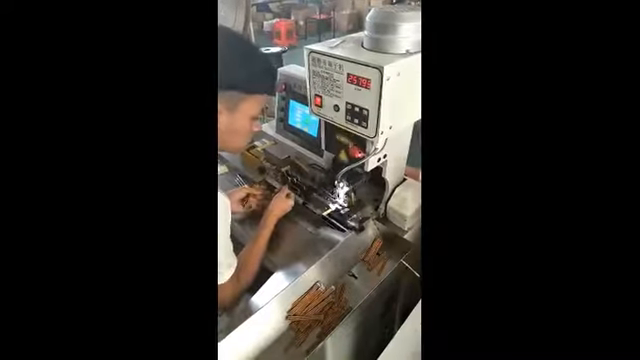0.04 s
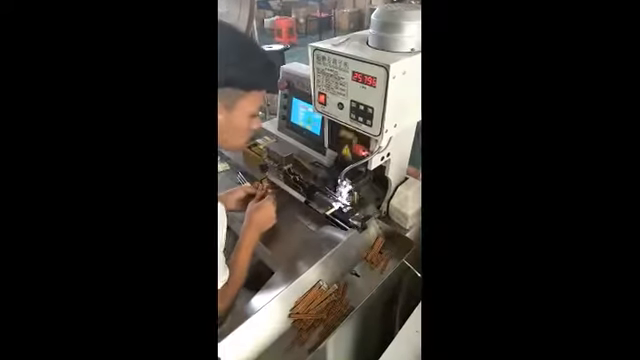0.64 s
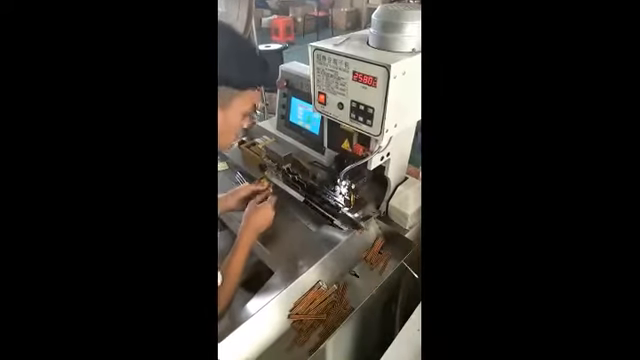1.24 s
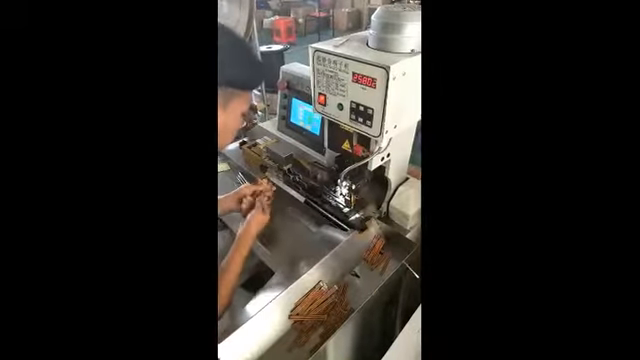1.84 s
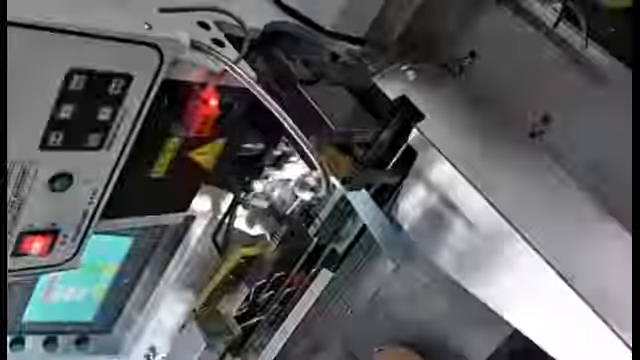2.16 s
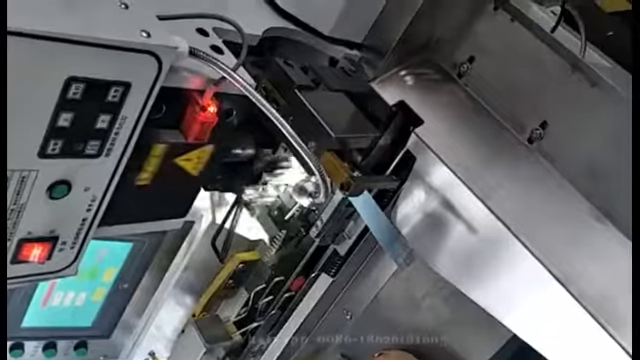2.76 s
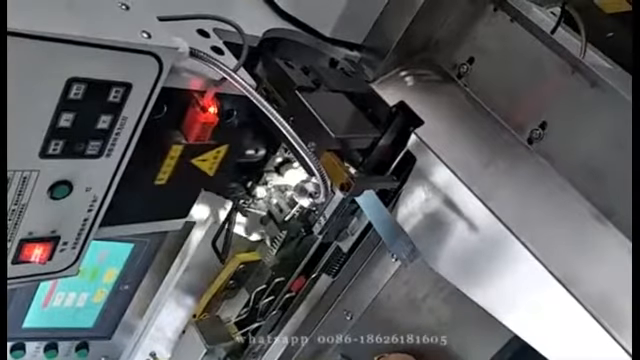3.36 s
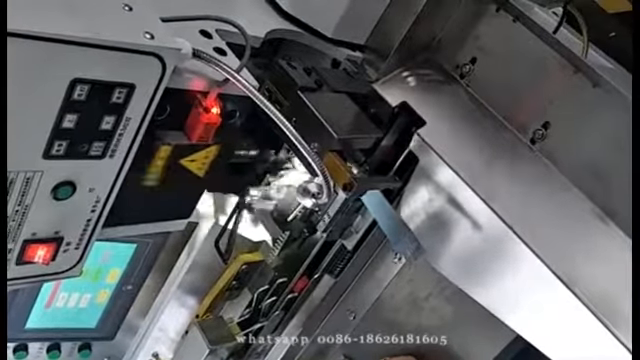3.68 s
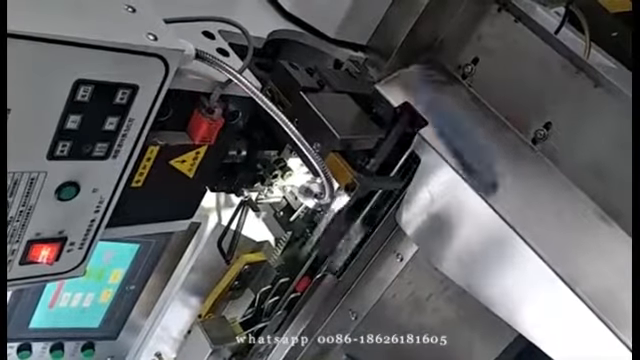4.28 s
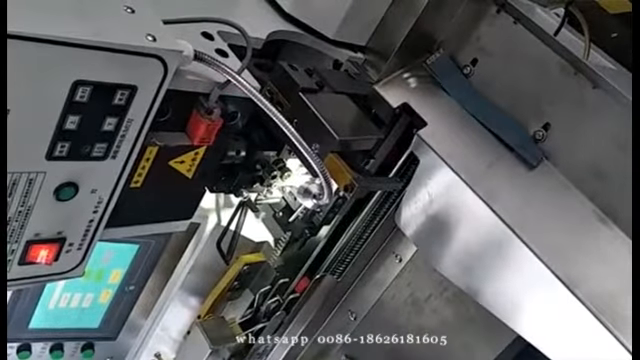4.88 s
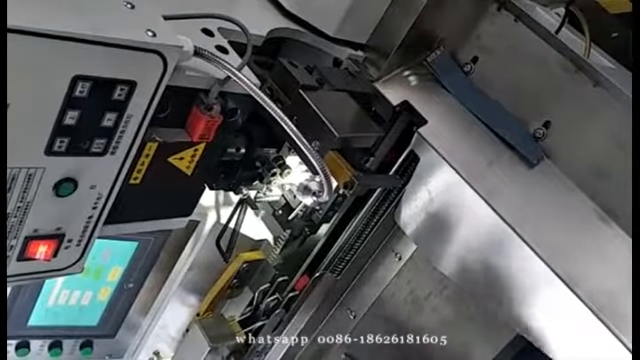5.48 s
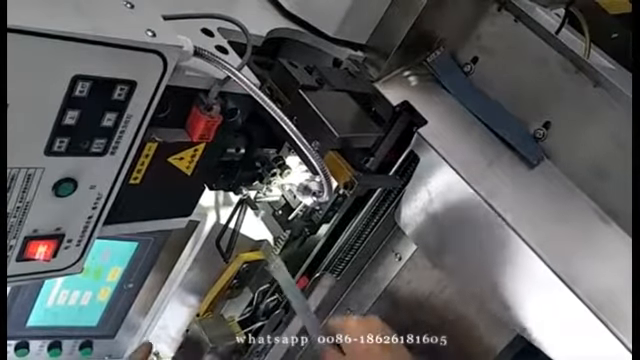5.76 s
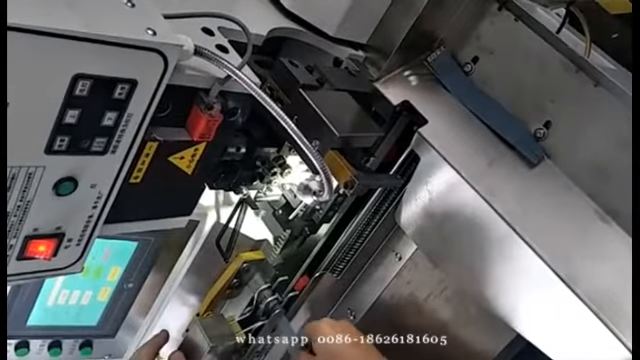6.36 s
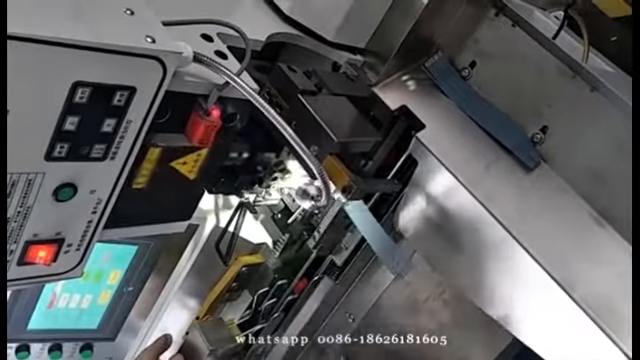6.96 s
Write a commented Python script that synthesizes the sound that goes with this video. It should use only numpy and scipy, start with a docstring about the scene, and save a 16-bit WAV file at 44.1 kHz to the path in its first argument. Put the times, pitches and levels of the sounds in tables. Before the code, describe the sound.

A crimping machine clacks in fast, even metal strokes, cuts off, then clacks more slowly, pauses over a motor hum and restarts.

```python
"""Fast, evenly timed clacks of a cable crimping press, heard in mono from beside the workbench.
Each stroke thumps the ram, knocks the frame, rings the jaws and spits air; a droning stepper motor runs
the rattling carriage into its stops and sheet steel rings. After a silent gap we listen in stereo over
the tray: a slower burst, a pause in which the next cable scrapes in over motor hum and room tone, and
then the gripper snaps and the carriage sets off again."""
import sys
import numpy as np
from scipy import signal
from scipy.fft import rfft, irfft, next_fast_len
from scipy.io import wavfile
from scipy.ndimage import uniform_filter1d

SR = 44100
rng = np.random.default_rng(int(sys.argv[2]) if len(sys.argv) > 2 else 0)


def persist_wave(psi):
    """Save psi, clipped to +-1, as 16-bit WAV."""
    counts = np.round(np.clip(psi, -1, 1) * 32767).astype(np.int16)
    wavfile.write(sys.argv[1], SR, np.atleast_2d(counts).T)


N = 310023

BESIDE_S, ABOVE_S = (0, 1.969), (2.605, 7.1)  # start and end beside the bench and over the tray
BESIDE_TOP_HZ, ABOVE_TOP_HZ = 14200, 7300
SHAKE_S, SETTLE_S = 0.12, 0.064  # after a run the frame shakes on; loose parts settle sooner

# The hits within one press stroke. Each row: time from the crimp in seconds, levels of thump, frame,
# jaw and valve in dB, decay in seconds.
FAST_CYCLE = [(-.045, -5, -5, -35.5, -33, 0.0073), (-.027, -15.5, -22, -9, -26, 0.0072),
              (-.008, -30, -16.5, -4.5, -4.5, 0.012), (0, -24, -10, -1, -19.5, 0.016),
              (0.012, -28.5, -18.5, -12.5, -28.5, 0.088), (0.016, -22, -18, -11.5, -20, .008),
              (0.027, -23, -14, -15.5, -26, .008), (0.052, -17.5, -9.5, -15, -20.5, 0.011)]
SLOW_CYCLE = [(-.05, -15, -2, -20, -35, 0.019), (-.018, -13, -2, -7.5, -23, 0.098),
              (0, -11.5, -8, -3, -14.5, 0.0087), (0.009, -17, -1.5, -15, -16.5, 0.033),
              (.058, -1, -11, -19, -26, 0.0072), (0.112, -7.5, -7, -9.5, -20.5, 0.024)]
# Carriage and clamps hitting their stops. Each row: start in seconds, levels of frame, thud and ring in
# dB, best-excited pitch in Hz, treble limit in Hz, second hit's offset in seconds and relative dB.
STOP_KNOCKS = [(.978, -30, -24, -31, 700, 2500, 0.015, -12), (1.094, -35, -21.5, -20, 353, 1960, .011, -3),
               (1.14, -16.5, -21.5, -18.5, 1060, 2500, 0.0069, -5),
               (1.161, -16.5, -27, -19, 700, 1200, 0.018, -8),
               (1.379, -27, -22.5, -34, 1000, 3980, .015, -2.5),
               (1.68, -17, -16, -15.5, 298, 2500, 0.017, -4.5),
               (1.771, -13.5, -35, -12, 1150, 7000, .008, -4), (4.1, -12.5, -20, -14, 380, 3800, .012, -5),
               (4.548, -17.5, -21, -21, 800, 1490, .007, -4),
               (4.571, -20, -23, -22.5, 800, 1200, 0.0098, -11.5),
               (4.65, -17.5, -26.5, -28, 795, 1200, .017, -5.5),
               (4.686, -24.5, -33, -27, 800, 900, 0.011, -9),
               (6.577, -20.5, -21, -33, 700, 3000, 0.0088, -3.5),
               (6.693, -24.5, -28, -43, 700, 2000, 0.013, -9),
               (6.73, -22, -23, -38, 695, 3000, 0.0077, -5.5),
               (6.957, -19, -16.5, -33, 450, 3000, .01, 1.5), (6.987, -23, -20, -44, 450, 1500, .012, 3)]
# The feed slide's knock: one such row without the start. Its softer hit comes 0.4 seconds earlier.
FEED_KNOCK = (-23, -31.5, -33, 908, 3001, -0.4, -3.5)
# Cam followers and cutter clacking. Each row: start in seconds, level in dB, best-excited pitch in Hz.
CAM_CLACKS = [(2.757, -29, 1600), (2.859, -27.5, 3300), (2.875, -27, 2170), (2.92, -25.5, 1700),
              (2.958, -27, 2600), (3.075, -25.5, 1900), (3.121, -23, 1550), (3.165, -29.5, 3200),
              (3.275, -26.5, 1700), (3.363, -24.5, 2800), (3.478, -29, 2800), (3.545, -32, 3300),
              (3.564, -21, 2400), (3.68, -25, 1610), (3.771, -22, 2000)]
# The gripper closing on the cable. Each row: start in seconds, level in dB, decay in seconds,
# relative ring level in dB, best-excited pitch in Hz.
GRIPPER_SNAPS = [(4.108, -36, .03, 7, 4800), (6.594, -30, .025, -6, 3500), (6.603, -29, .012, -4, 3300),
                 (6.61, -21.5, .01, 7, 3600), (6.731, -27, .007, 9.5, 3950), (6.738, -27, .006, 6, 3950)]
# The gripper's catch springing home: start in seconds, level in dB, decay in seconds.
CATCH_SNAP = (6.615, -36, .003)
# Runs of feeder and carriage. Each row: start, stop and run-up in seconds, slide level in dB,
# chatter against slide in dB, rubbing against loose ticks in dB.
CARRIAGE_RUNS = [(-.1, 1.12, .05, -22.5, -8, 3), (1.374, 1.71, 0.031, -26.5, -4.5, 5),
                 (2.62, 3.86, 0.17, -28, -8, 1), (3.89, 4.58, 0.18, -29, -6, 0.5),
                 (4.39, 4.53, 0.09, -45.5, 2, 13), (6.55, 7.1, 0.26, -25.5, -4, 5)]
# Stepper moves. Each row: start and stop in seconds, opening pitch in Hz, glide in Hz per second,
# levels of drone and buzz in dB.
STEPPER_MOVES = [(1.023, 1.17, 197.7, -100, -33, -46), (1.372, 1.47, 176, 20, -36, -44),
                 (1.43, 1.585, 181, -18, -26, -40.5), (1.545, 1.675, 184, 35, -25, -41),
                 (3.953, 4.011, 206, 47, -22, -49), (4.261, 4.408, 202, -130, -29.5, -51),
                 (4.448, 4.565, 191.3, 221, -31, -49)]
# Exhaust air. Each row: time of the peak in seconds, level in dB, rise and decay in seconds.
AIR_PUFFS = [(.13, -29, 0.04, 0.056), (0.251, -27.5, 0.029, 0.087), (1.096, -33, 0.0061, .04),
             (1.395, -49, 0.0042, 0.063), (1.55, -32, 0.041, 0.032), (1.685, -28, 0.011, 0.03)]
# The idling motor's tones. Each row: pitch in Hz, level in dB.
HUM_TONES = [(96.9, -42.5), (192.5, -48.5), (263.8, -49.5), (384, -56), (446.8, -46.5), (1039, -61.5),
             (1730, -58.5), (3300, -61.5)]
# A swell added to the lowest tone under load: start in seconds, relative level in dB, decay in seconds.
LOAD_SURGE = (6.577, 9.9, .14)

# Ringing steel parts. Each row: pitch in Hz, level in dB, time to fall by 60 dB in seconds.
JAW_MODES = [(1550, 2.5, 0.27), (1725, -1.5, 0.26), (1897, -7, 0.22), (3250, -3.5, 0.068),
             (3340, -6, 0.052), (3500, -6.5, 0.1), (4190, -7.5, 0.14), (4690, -0.5, 0.12),
             (5300, -2.5, 0.082)]
LINKAGE_MODES = [(988, 2, 0.12), (1526, -1.5, .1), (1615, -5.5, .09), (1720, -2, 0.15), (1940, -6.5, .1),
                 (2810, -9, 0.13), (3100, -5, 0.099), (3334, -2.5, .14), (4000, -6.5, .1),
                 (4530, -6.5, .09), (5460, -7.5, 0.073)]
HOUSING_MODES = [(345, -3.5, .5), (446, -2, .33), (642, -6, .2), (715, -9, 0.26), (779, -1.5, 0.3),
                 (901, -1.5, .15), (1066, -7.5, .2), (1200, -6, .15), (1333, -10, 0.33), (1510, -8, 0.153),
                 (1610, -11, .3)]
TRAY_MODES = [(437, -3.5, 0.78), (553, -7, 0.11), (658, -3.5, .23), (700, -4.5, .44), (755, -4.5, 0.75),
              (781.7, -2.5, .6), (819, -2, .14), (841, -14, 1.5), (1264, -6, .2), (1540, -7.5, 0.14),
              (1745, -2, 0.17)]
GRIPPER_MODES = [(2246, -12, .08), (3150, -9, .05), (3330, -6, .07), (3710, -3, .04), (3840, -6, .035),
                 (3967, -5, .055), (4170, -11, .08)]

# Resonances of frame, jaws, rails, panels and room tone. Each row: centre in Hz, width in Hz, dB boost.
FRAME_PEAKS = [(199.8, 37, 10.5), (374.4, 25, 4.5), (447, 20, 6.5), (666, 16, 7.5), (788, 18, 6),
               (935, 22, 3.5), (1056.5, 33, 8.5), (1213, 33, 7.5), (1514, 28, 10.5), (1806, 70, 7)]
JAW_PEAKS = [(1670, 130, 4.3), (3460, 110, 2.6), (4237, 64, 6), (4700, 23, 3.5), (5660, 160, 4.3)]
RAIL_PEAKS = [(1924, 73, 7.5), (2680, 77, 9), (3120, 80, 2), (3886, 120, 5.5)]
PANEL_PEAKS = [(450, 38, 6.1), (714, 40, 5), (910, 40, 8.3), (1065, 53, 21), (1217, 42, 10), (1550, 110, 6)]
SHOP_PEAKS = [(445, 46, 4), (1700, 76, 4.5), (2710, 110, 3.5)]

# Tone colours of the machine's parts and the workshop air. Each row: frequency in Hz, relative dB.
THUMP_EQ = [(30, -20.5), (70, -13), (110, 1.5), (200, -3.5), (340, 1), (600, -21), (2000, -46)]
JAW_EQ = [(300, -23), (1000, -10), (1700, 3.5), (2400, 0.5), (4200, 2), (6000, -5), (8000, -11),
          (14000, -22)]
VALVE_EQ = [(500, -29), (3000, -0.5), (6000, 6), (9000, -6.5), (12000, -1), (14000, 0.5)]
GRIPPER_EQ = [(400, -21), (1500, -7.5), (2800, -6), (3400, -6), (3900, -3), (4300, -15), (5200, -23),
              (8000, -31.5)]
CATCH_EQ = [(2500, -30), (4400, -10), (6000, 3), (8200, 0), (8700, -45), (14000, -66)]
LEAK_EQ = [(2000, -20.5), (4000, -11.5), (4550, 6.5), (5200, -12.5), (7500, -10.5), (9000, -28.5),
           (14000, -22.5)]
SHOP_EQ = [(25, -20), (55, -4.5), (90, -2.5), (170, -2), (300, -7), (480, -8.5), (600, -14), (780, -13),
           (1200, -19.5), (1750, -19.5), (2300, -19), (4300, -25), (5200, -35.5), (7400, -45.5),
           (11000, -58)]
# Frame knock, cabinet thud, slide rumble and bright chatter as they sound from each listening place.
# Each row: frequency in Hz, relative level in dB.
KNOCK_BESIDE_EQ = [(100, -19.5), (300, -4), (450, -0.5), (800, 4), (1150, 2), (1650, -9.5), (2100, -23),
                   (5000, -27.5), (12000, -53)]
KNOCK_ABOVE_EQ = [(100, -19.5), (300, 0.5), (480, -3), (800, 7), (1100, -6.5), (1700, -3.5), (2400, -15),
                  (4000, -14), (7000, -35.5)]
THUD_BESIDE_EQ = [(50, -21), (115, 1), (210, -22), (290, 6), (345, -4), (430, -2), (700, -24),
                  (2000, -69.5)]
THUD_ABOVE_EQ = [(50, -18), (95, 6), (160, 5), (300, -7), (400, 0.5), (470, 16), (580, -5.5), (900, -16),
                 (2000, -29)]
SLIDE_BESIDE_EQ = [(30, -30), (70, -8.5), (115, 5.5), (200, -1), (400, 0.5), (700, 0), (1200, -6.5),
                   (1700, -16), (2500, -22.5), (8000, -51)]
SLIDE_ABOVE_EQ = [(30, -11.5), (70, -10.5), (105, 3), (200, -2), (420, 2), (800, -1), (1200, -10.5),
                  (1800, -17.5), (2600, -23.5), (8000, -42)]
CHATTER_BESIDE_EQ = [(400, -10), (1500, 7), (2400, -2.5), (4300, -2.5), (6000, -10), (8000, -15.5),
                     (14000, -23.5)]
CHATTER_ABOVE_EQ = [(400, -8), (1200, 1.5), (1900, 3.5), (2500, 0), (4000, -2), (5000, -12.5), (7400, -22)]

# Stereo width from reflections over the tray. Each row: frequency in Hz, side against mid in dB.
STEREO_WIDTH = [(60, -33.5), (120, -38), (200, -28), (370, -12), (680, -3), (1260, -1), (2600, 1.5),
                (4200, 0), (7500, -0.5)]
# The machine stands to the right. Each row: frequency in Hz, left minus right in dB at an offset of 1.
STEREO_BALANCE = [(110, -1.5), (370, -3.5), (680, -9), (1260, -5), (2300, -0.5), (4200, 3)]


def press(strokes, cycle, frame_eq, jaw_eq, modes, crack_db, ring_db, ring_hz):
    """Each stroke runs one cam cycle: the ram thumps, the frame knocks, jaws clack, the valve spits."""
    def part(column):
        hits = [(s + step[0], db + step[column], step[-1]) for s, db in strokes for step in cycle]
        return blows(hits, room_db=-12.5, room_s=0.083, crack_db=crack_db)
    thump = colour(part(1), THUMP_EQ)
    frame = colour(part(2), frame_eq, FRAME_PEAKS)
    jaws = colour(part(3), jaw_eq, JAW_PEAKS)
    valve = colour(part(4), VALVE_EQ)
    jaw_hits = [(s + lag, db + jaw_db + ring_db, ring_hz)
                for s, db in strokes for lag, _, _, jaw_db, _, _ in cycle if s + lag > 0]
    return thump + frame + jaws + valve + ring(jaw_hits, modes, octaves=2.4, rough=.22)


def stroke_burst(first_s, period_s, db, count, run_up_db=0, run_up_s=0.16):
    """Evenly timed strokes (s, dB); with a run-up they start soft and build to full force."""
    elapsed = period_s * np.arange(count)
    return list(zip(first_s + elapsed, db + run_up_db * np.exp(-elapsed / run_up_s)))


def carriage_stops(knocks, frame_eq, thud_eq, modes, room_db, room_s, rough):
    """The carriage hits each stop twice: a hard knock, a dull cabinet thud and ringing steel."""
    hits = [(s + lag, frame + db, thud + db, steel + db, hz, top)
            for s, frame, thud, steel, hz, top, second_s, second_db in knocks
            for lag, db in ((0, 0), (second_s, second_db))]
    s, frame_db, thud_db, ring_db, best_hz, top_hz = np.transpose(hits)
    knock = heavy_blows(zip(s, frame_db, top_hz), decay_s=0.013, room_db=room_db, room_s=room_s)
    thud = heavy_blows(zip(s, thud_db, top_hz), decay_s=0.0074, room_db=-8, room_s=0.096)
    steel = ring(zip(s, ring_db, best_hz), modes, octaves=0.68, rough=rough)
    return colour(knock, frame_eq, FRAME_PEAKS) + colour(thud, thud_eq) + steel


def feed_knocks(strokes, lead_s=.047):
    """Cues for the feed slide, which meets its stop just ahead of each crimp in mid-burst."""
    return [(s - lead_s, *FEED_KNOCK) for s, _ in strokes[2:-1]]


def linkage():
    """Steel followers drop against their cams: a short hard clack, then the linkage rings."""
    hits = blows([(s, db, .012) for s, db, _ in CAM_CLACKS], room_db=-12, room_s=0.032, crack_db=-18)
    clack = undb(-10) * colour(hits, CHATTER_ABOVE_EQ, JAW_PEAKS)
    return clack + ring(CAM_CLACKS, LINKAGE_MODES, octaves=0.87, rough=0.33)


def gripper():
    """The gripper snaps shut with a rough, quickly damped clack and a short ring."""
    s, db, decay, ring_db, best_hz = np.transpose(GRIPPER_SNAPS)
    hits = blows(zip(s, db, decay), room_db=-13, room_s=0.03, crack_db=-20)
    steel = ring(zip(s, db + ring_db, best_hz), GRIPPER_MODES, octaves=0.45, rough=.4)
    return undb(2.5) * colour(hits, GRIPPER_EQ) + steel


def catch():
    """The gripper's catch springs home with one bright mono snap."""
    return colour(blows([CATCH_SNAP], room_db=-20, room_s=.012, crack_db=-12), CATCH_EQ)[0]


def carriage_rattle(runs, slide_eq, chatter_eq, spread_db):
    """Moving slides shake the frame and rub, while small loose parts chatter."""
    slides = colour(contacts(rate=300, spread_db=2, smear_s=0.004), slide_eq, FRAME_PEAKS)
    rub = colour(contacts(rate=110, spread_db=-1.5, smear_s=0.02), chatter_eq, JAW_PEAKS + RAIL_PEAKS)
    ticks = colour(loose_parts(rate=125, spread_db=spread_db, ring_s=.015), chatter_eq, JAW_PEAKS)
    out = 0
    for start, stop, rise, db, chatter_db, rub_db in runs:
        blend = (ticks + undb(rub_db) * rub) / np.hypot(1, undb(rub_db))
        chatter = undb(chatter_db) * swell(start, stop, rise, SETTLE_S) * blend
        rumble = swell(start, stop, rise, SHAKE_S) * slides
        out = out + undb(db) * (rumble + chatter)
    return out


def loose_parts(rate, spread_db, ring_s, partials=5):
    """Small steel parts tick at random, each ringing briefly at a few pitches of its own."""
    out, t = np.zeros((2, N + SR)), np.arange(SR // 25) / SR
    for _ in range(int(rate * N / SR)):
        start = rng.integers(N)
        size = undb(spread_db * np.clip(rng.standard_normal(), -2, 2))
        hz = 800 * 17 ** rng.random((2, partials, 1))  # 800 to 13600 Hz
        tones = np.sqrt(hz) * np.sin((2 * np.pi * hz * t).astype(np.float32))
        out[:, start:start + len(t)] += size * tones.sum(axis=1) * np.exp(-t / ring_s)
    return out[:, :N] / out[:, :N].std()


def stepper(ramp_s=0.032, db_per_octave=-3.5):
    """The carriage motor drones on each move; its buzz whines as it glides through panel resonances."""
    out = np.zeros(N)
    orders = np.arange(3, 19)[:, None] / 2  # buzz partials, spaced at half the drone's pitch
    waver, strain = 1 + 0.0047 * walk(40), undb(0.51 * walk(53))
    for start, stop, hz, glide, drone_db, buzz_db in STEPPER_MOVES:
        span = np.arange(int(start * SR), int(stop * SR))
        t = span / SR
        pitch = (hz + glide * (t - start)) * waver[span]
        cycles = np.cumsum(pitch) / SR
        drive = np.clip(np.minimum(t - start, stop - t) / ramp_s, 0, 1)
        gains = undb(buzz_db + db_per_octave * np.log2(orders) + resonances(PANEL_PEAKS, orders * pitch))
        buzz = np.sum(gains * np.sin(2 * np.pi * (orders * cycles + rng.random(orders.shape))), axis=0)
        out[span] += drive * (undb(drone_db) * np.sin(2 * np.pi * cycles) + buzz)
    return np.sqrt(2) * strain * out


def air_valves():
    """Cylinders vent in short hisses over the faint, steady leak of a fitting."""
    t = np.arange(N) / SR
    flow = sum(undb(db) * np.exp(-np.maximum((s - t) / rise, (t - s) / decay))
               for s, db, rise, decay in AIR_PUFFS)
    leak = colour(rng.standard_normal((2, N)), LEAK_EQ)
    puffs = colour(flow * rng.standard_normal((2, N)), VALVE_EQ)
    return puffs + undb(-53.5) * leak


def cable_scrape(start_s=5.14, end_s=6.55):
    """The next cable rubs along its guide, a faint scrape that grows as it is pushed in."""
    rub = colour(contacts(rate=270, spread_db=6, smear_s=.008, wash=1.7), CHATTER_ABOVE_EQ, JAW_PEAKS)
    return undb(-41.5) * swell(start_s, end_s, end_s - start_s, SETTLE_S) * rub


def motor_hum():
    """The idling motor's tones waver; the lowest swells as it takes up the load."""
    load_s, load_db, load_decay = LOAD_SURGE
    surge = 1 + undb(load_db) * swell(load_s, load_s, .01, load_decay)
    tones = 0
    for k, (hz, db) in enumerate(HUM_TONES):
        phase = 2 * np.pi * np.cumsum(hz + (2 + .002 * hz) * walk(22)) / SR
        level = np.sqrt(2) * undb(db + 2.4 * walk(7)) * (surge if k == 0 else 1)
        tones = tones + level * np.sin(phase + 2 * np.pi * rng.random((2, 1)))
    return tones


def room_tone():
    """Steady workshop background noise, with a slight watery flicker in each band."""
    wash = colour(contacts(rate=180, spread_db=4, smear_s=0.037), SHOP_EQ, SHOP_PEAKS)
    wash = flicker(wash, depth_db=1.7, rate=20)
    return undb(-35.5 + 1.2 * walk(5.5)) * wash


def blows(hits, room_db, room_s, crack_db):
    """Each hit (s, dB, decay s) is one hard crack, a quickly dying burst of rebounds and a room tail."""
    power, cracks, t = np.zeros(N), np.zeros((2, N)), np.arange(SR // 2) / SR
    for s, db, decay in hits:
        start = max(int(s * SR), 0)
        burst = undb(db) ** 2 * (np.exp(-2 * t / decay) + undb(room_db) ** 2 * np.exp(-2 * t / room_s))
        power[start:start + len(t)] += burst[:N - start]
        cracks[0, start] += (s > 0) * undb(crack_db) * np.sqrt(burst.sum())
    return cracks + np.sqrt(power) * contacts(rate=830, spread_db=1, smear_s=0.00033)


def heavy_blows(hits, decay_s, room_db, room_s, crack_db=-7.5):
    """Each hit (s, dB, treble limit Hz) is a push, a shudder and a room tail; soft contact is dull."""
    out, t = np.zeros((2, N + SR)), np.arange(SR // 2) / SR
    power = np.exp(-2 * t / decay_s) + undb(room_db) ** 2 * np.exp(-2 * t / room_s)
    for s, db, top_hz in hits:
        blow = np.sqrt(power) * rng.standard_normal((2, len(t)))
        blow[0, 0] += undb(crack_db) * np.sqrt(power.sum())
        start = int(s * SR)
        out[:, start:start + len(t)] += undb(db) * signal.lfilter(*signal.butter(2, top_hz, fs=SR), blow)
    return out[:, :N]


def ring(hits, modes, octaves, rough, knots=16):
    """Steel rings after each hit (s, dB, Hz), favouring modes near that pitch; loose joints waver it."""
    out, hits = np.zeros((2, N)), list(hits)
    for hz, mode_db, t60 in modes:
        t = np.arange(int(t60 * SR)) / SR
        tone = np.exp((2j * np.pi * hz - np.log(1000) / t60) * t)
        for s, db, best_hz in hits:
            start = int(s * SR)
            detune = np.log2(hz / best_hz) / octaves
            size = undb(db + mode_db) / (1 + detune ** 2) / np.sqrt(1 + 2 * rough ** 2)
            phasor = np.exp(2j * np.pi * rng.random((2, 1)))
            wavers = 1 + rough * (rng.standard_normal((2, knots, 2)) @ [1, 1j])
            for channel, waver in zip(out, size * phasor * wavers):
                envelope = np.interp(t, np.linspace(0, t60, knots), waver)
                channel[start:start + len(t)] += (envelope * tone).imag[:N - start]
    return out


def contacts(rate, spread_db, smear_s, wash=1.0):
    """Grainy mid and side noise: dense tiny impacts, smeared by nearby panels, over an even wash."""
    sizes = (rng.random(N) < rate / SR) * undb(spread_db * np.clip(rng.standard_normal(N), -2, 2))
    power = signal.lfilter([1], [1, -np.exp(-2 / (smear_s * SR))], sizes ** 2)
    return rng.standard_normal((2, N)) * np.sqrt((power / power.mean() + wash ** 2) / (1 + wash ** 2))


def colour(x, eq, peaks=(), size=4096):
    """Minimum-phase EQ of unit power: a broad curve with resonances on top."""
    hz = np.fft.rfftfreq(size, 1 / SR)
    db = curve_at(eq, hz) + resonances(peaks, hz)
    cepstrum = irfft(np.log(undb(db)))
    cepstrum[1:size // 2] *= 2  # folded forward, so nothing rings ahead of an attack
    cepstrum[size // 2 + 1:] = 0
    taps = irfft(np.exp(rfft(cepstrum)))
    return signal.oaconvolve(x, taps[None] / np.linalg.norm(taps), axes=1)[:, :N]


def flicker(x, depth_db, rate, bands=18):
    """Each band of a noise wavers in level on its own."""
    size = next_fast_len(N)
    spectrum = rfft(x, size)
    place = curve_at([(50, 0), (5000, bands - 1)], np.fft.rfftfreq(size, 1 / SR))
    masks = (np.maximum(1 - np.abs(place - k), 0) for k in range(bands))
    return sum(irfft(spectrum * mask, size)[:, :N] * undb(depth_db * walk(rate)) for mask in masks)


def resonances(peaks, hz):
    """Boost in dB that the peaks give at each frequency."""
    return sum(db / (1 + (2 * (hz - centre) / width) ** 2) for centre, width, db in peaks)


def curve_at(points, hz):
    """Read (Hz, value) points on a log-frequency axis."""
    point_hz, value = np.transpose(points)
    return np.interp(np.log(hz + 1), np.log(point_hz), value)


def swell(start, stop, rise_s, fall_s):
    """Envelope that rises evenly, holds, and dies away after the stop."""
    t = np.arange(N) / SR
    return np.clip((t - start) / rise_s, 0, 1) * np.exp(-np.maximum(t - stop, 0) / fall_s)


def walk(rate):
    """Smooth random drift through `rate` values a second, with a spread near 1."""
    hold = int(SR / rate)
    steps = np.repeat(rng.standard_normal(N // hold + 1), hold)
    return uniform_filter1d(uniform_filter1d(steps, hold), hold)[:N] / np.sqrt(.5)


def undb(db):
    """Decibels to gain."""
    return 10 ** (np.asarray(db) / 20)


def low_pass(x, top_hz):
    """Steep treble cut."""
    return signal.sosfilt(signal.ellip(10, .2, 80, top_hz, fs=SR, output="sos"), x)


def during(cues, span):
    """The cues that start within a span, or up to half a second before it."""
    return [cue for cue in cues if span[0] - .5 <= cue[0] < span[1]]


def stereo_image(sound, offset):
    """Mid and side to left and right: narrow bass, treble widened by reflections, a lean to one side."""
    size = next_fast_len(N)
    hz = np.fft.rfftfreq(size, 1 / SR)
    mid, side = rfft(sound, size)
    side = side * undb(curve_at(STEREO_WIDTH, hz))
    lean = undb(offset * curve_at(STEREO_BALANCE, hz) / 2)
    return irfft(np.array([(mid + side) * lean, (mid - side) / lean]), size)[:, :N]


def perspective(sound, span, top_hz, fade_db=0, fade_s=0.17):
    """One listening place: faded up from fade_db, softly clipped, cut to its span, treble trimmed."""
    t = np.arange(N) / SR
    fade = undb(fade_db * np.exp(-np.abs(t - span[0]) / fade_s))
    gate = (t >= span[0]) & (t < span[1])
    return low_pass(np.tanh(sound * fade) * gate, top_hz)


def scene():
    """Fast crimping in mono beside the bench; slower crimping, pause and restart in stereo above."""
    bed = motor_hum() + room_tone()
    motor = stepper()
    fast = stroke_burst(first_s=.009, period_s=.14475, db=-15.5, count=7)
    slow = stroke_burst(first_s=2.757, period_s=.202, db=-22.5, count=6, run_up_db=-6)

    beside = press(fast, FAST_CYCLE, KNOCK_BESIDE_EQ, JAW_EQ, JAW_MODES,
                   crack_db=-24.5, ring_db=-8.5, ring_hz=3000)
    beside += carriage_stops(during(STOP_KNOCKS, BESIDE_S), KNOCK_BESIDE_EQ, THUD_BESIDE_EQ,
                             HOUSING_MODES, room_db=-13, room_s=0.045, rough=0.64)
    beside += carriage_rattle(during(CARRIAGE_RUNS, BESIDE_S), SLIDE_BESIDE_EQ, CHATTER_BESIDE_EQ,
                              spread_db=0.5)
    beside += air_valves() + motor + undb(-3.5) * bed

    above = press(slow, SLOW_CYCLE, KNOCK_ABOVE_EQ, CHATTER_ABOVE_EQ, LINKAGE_MODES,
                  crack_db=-26, ring_db=-3.5, ring_hz=2400)
    above += carriage_stops(during(STOP_KNOCKS, ABOVE_S) + feed_knocks(slow), KNOCK_ABOVE_EQ,
                            THUD_ABOVE_EQ, TRAY_MODES, room_db=-14, room_s=0.1, rough=.35)
    above += carriage_rattle(during(CARRIAGE_RUNS, ABOVE_S), SLIDE_ABOVE_EQ, CHATTER_ABOVE_EQ,
                             spread_db=3)
    above += linkage() + gripper() + cable_scrape() + motor
    above = stereo_image(above, offset=0.31) + stereo_image(bed, offset=0.27)
    return (perspective(beside[0], BESIDE_S, BESIDE_TOP_HZ)
            + perspective(above, ABOVE_S, ABOVE_TOP_HZ, fade_db=-4) + catch())


def record(dry):
    """Trim the highest treble off the whole mix."""
    return low_pass(dry, BESIDE_TOP_HZ)


dry = scene()
out = record(dry)
persist_wave(out)
```